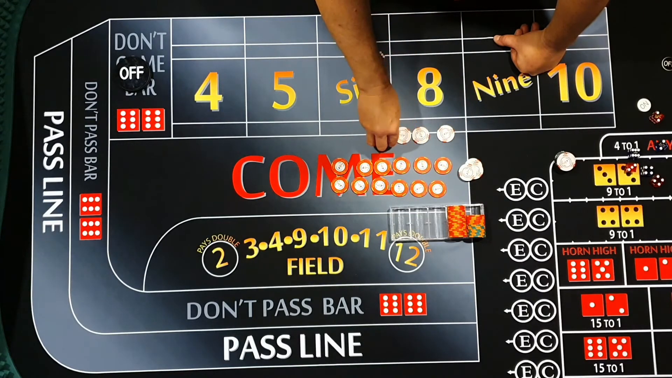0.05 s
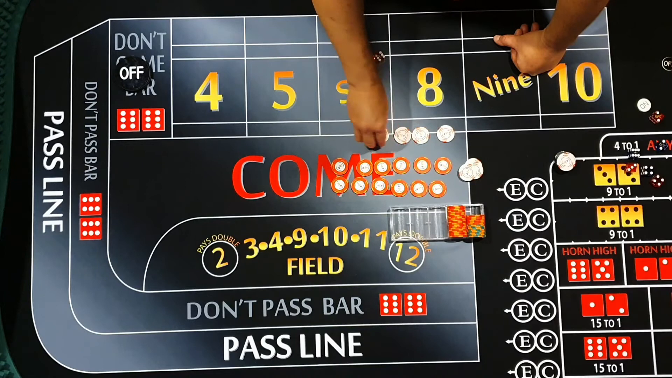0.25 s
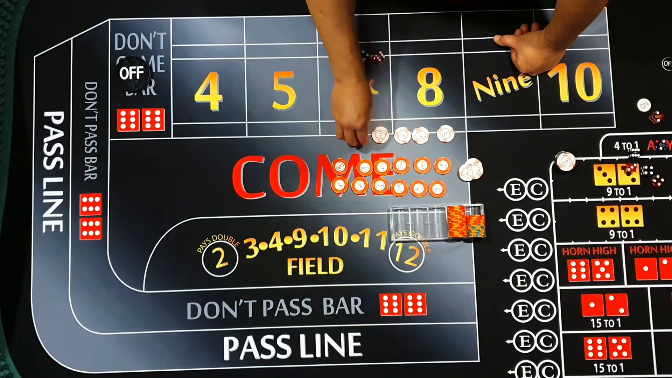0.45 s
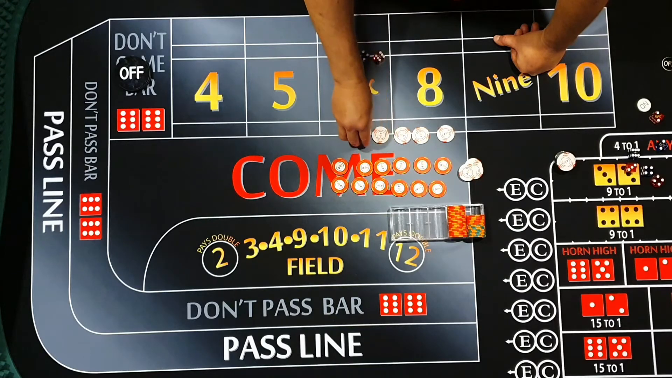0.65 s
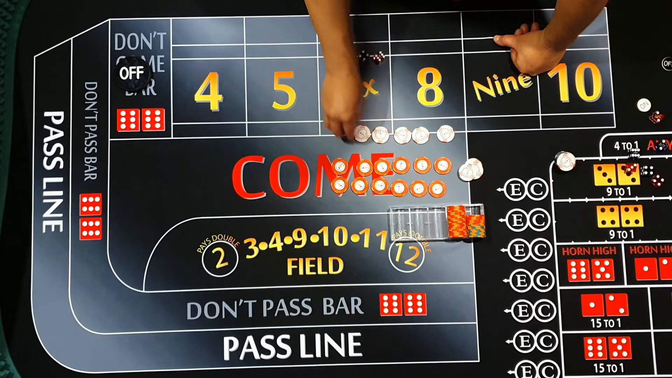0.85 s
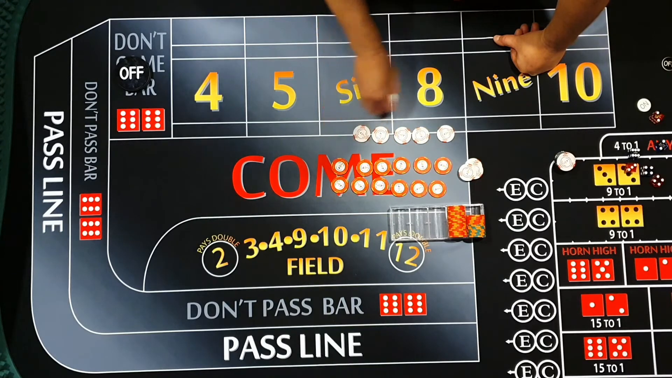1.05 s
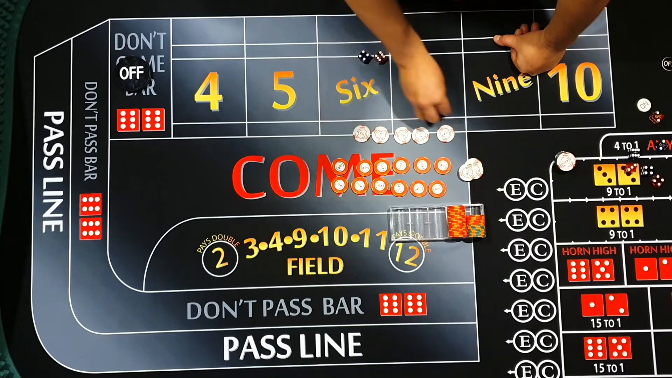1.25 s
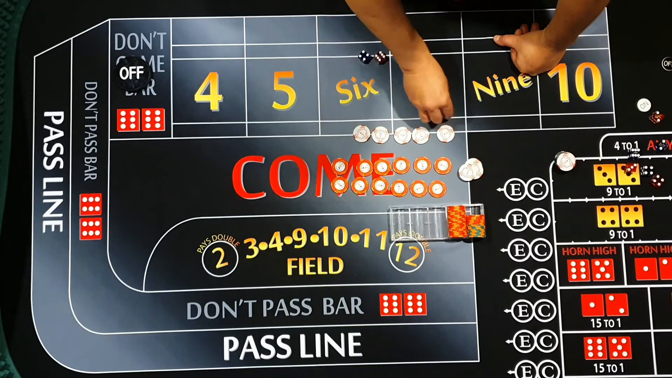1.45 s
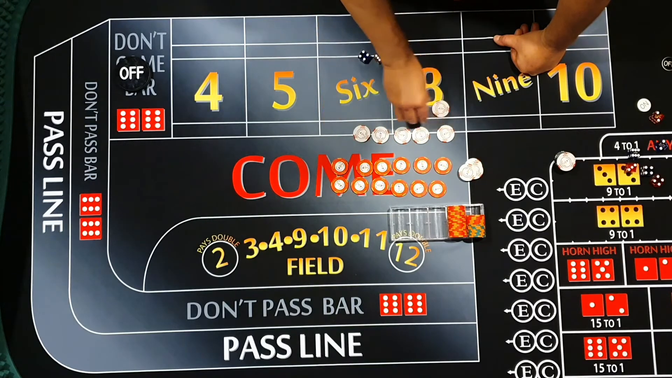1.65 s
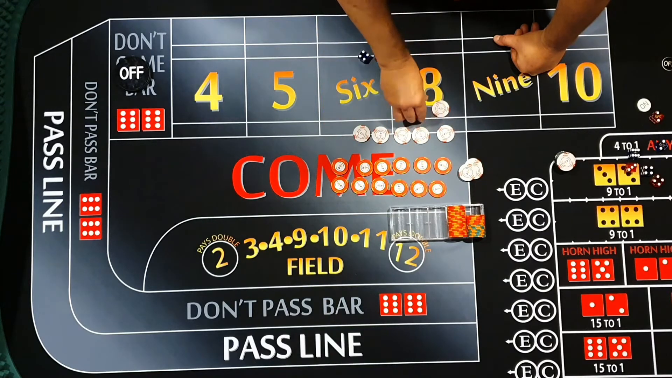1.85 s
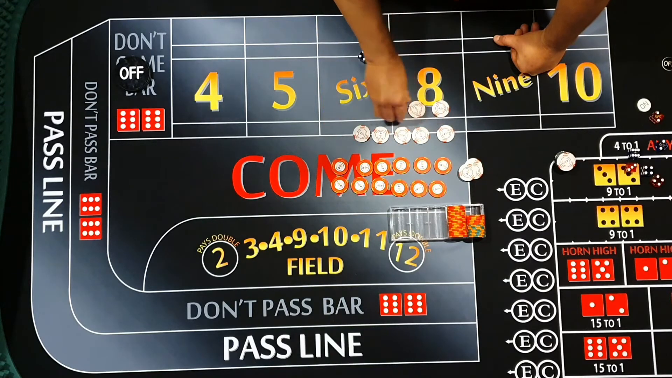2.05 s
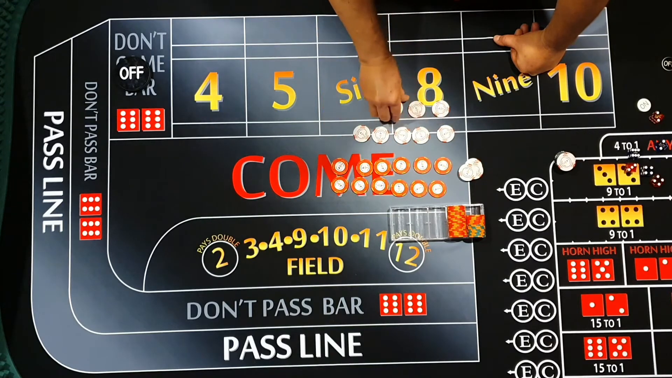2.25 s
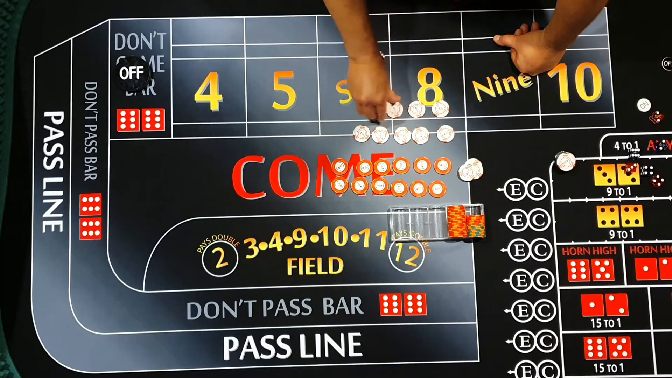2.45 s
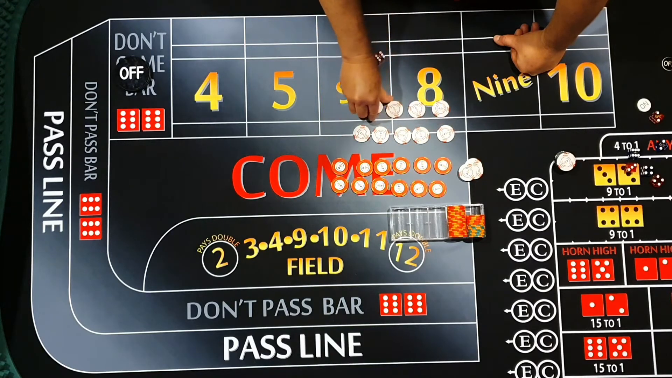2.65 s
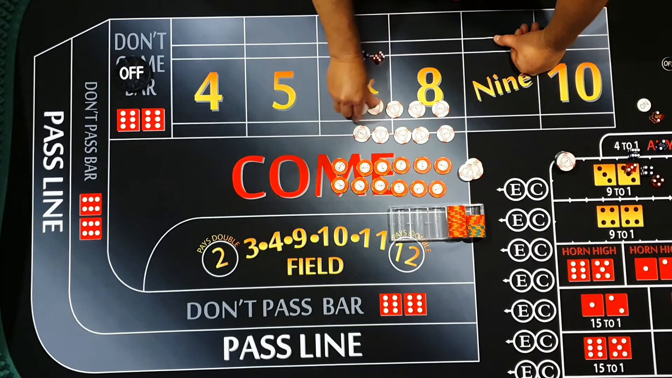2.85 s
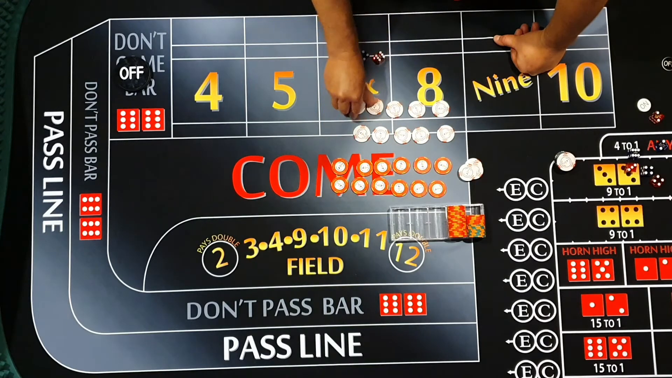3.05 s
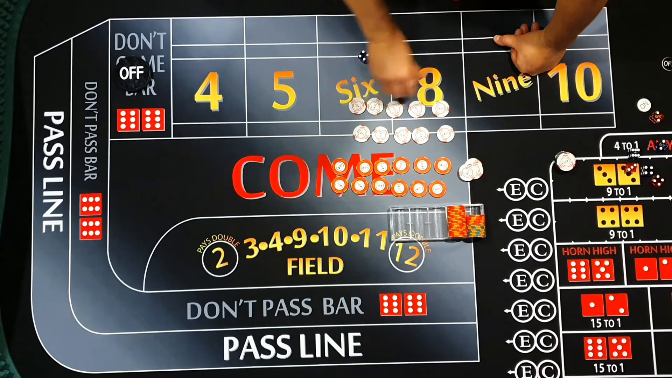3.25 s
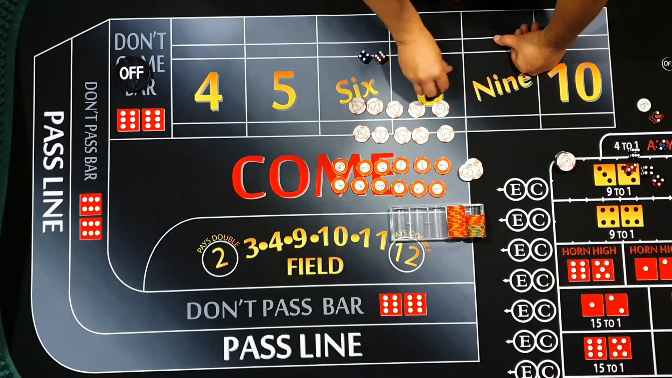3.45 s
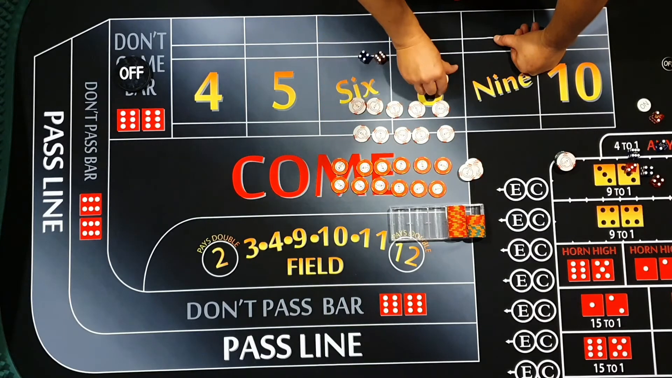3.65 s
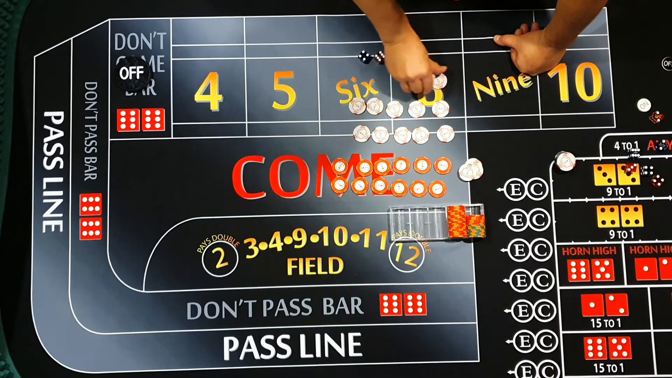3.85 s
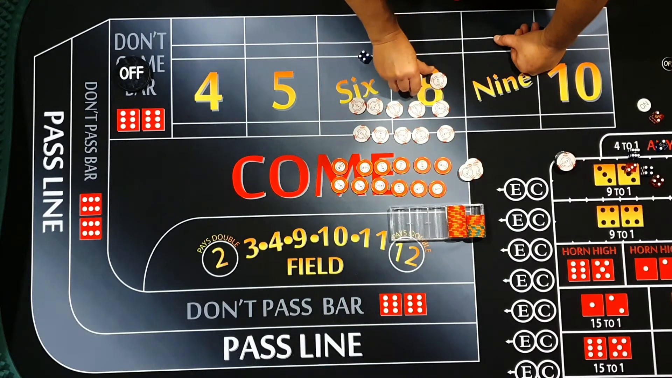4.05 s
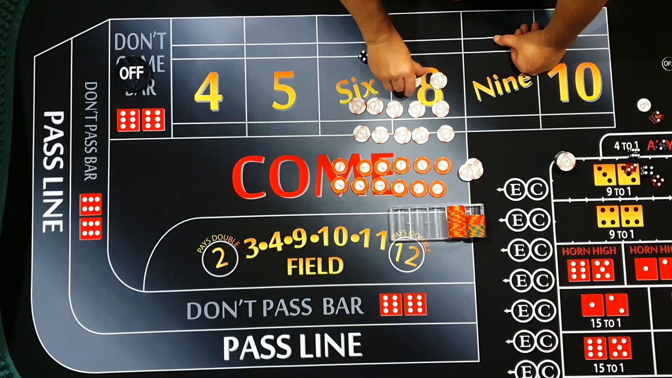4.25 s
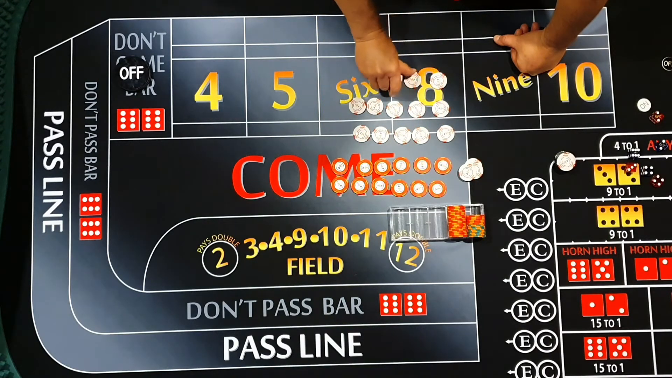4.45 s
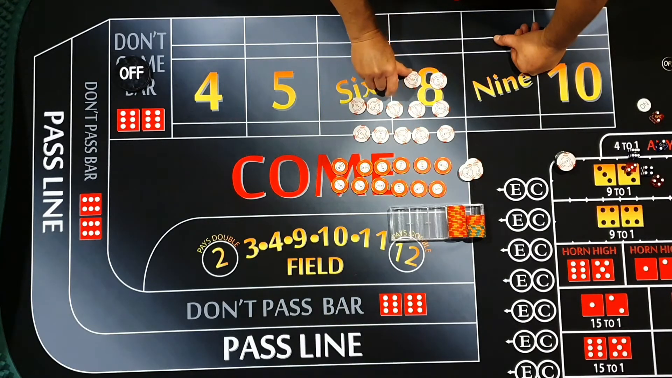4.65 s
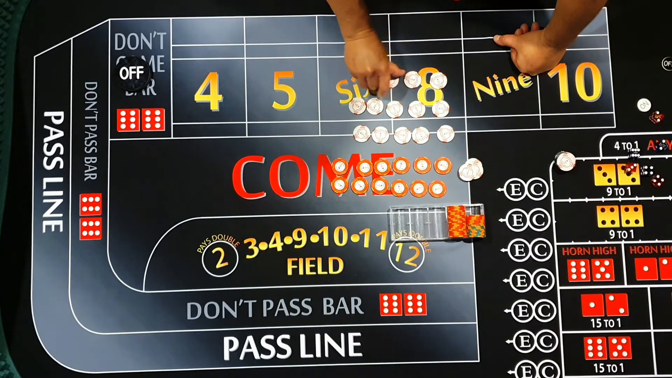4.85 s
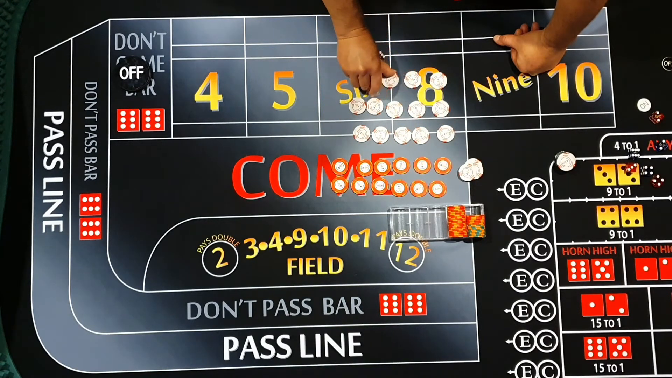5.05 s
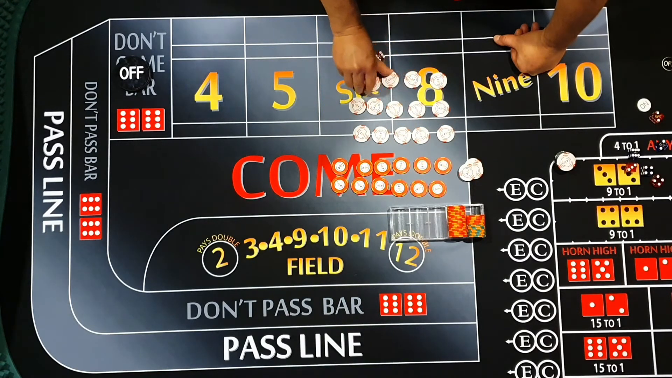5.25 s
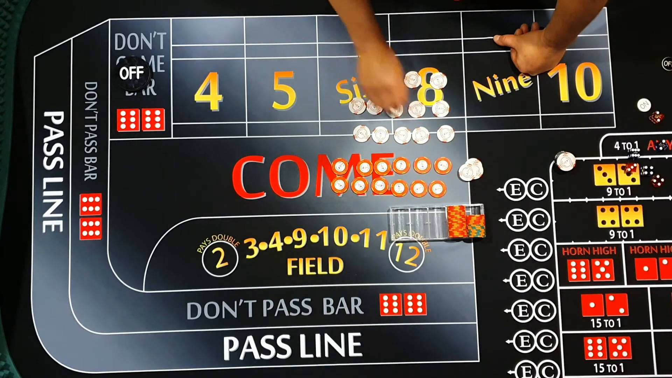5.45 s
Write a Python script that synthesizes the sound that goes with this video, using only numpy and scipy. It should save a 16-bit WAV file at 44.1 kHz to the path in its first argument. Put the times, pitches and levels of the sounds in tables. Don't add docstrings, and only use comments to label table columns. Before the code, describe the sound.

A hand slides faintly off felt for the first 0.3 seconds, while a clay chip lands at 0.2 with a sharp click and dull woody thump. More chips follow at 0.7, 1.47 (softer), 1.79, 2.31, 2.61, 2.96, 3.71, 4.14, 4.64 and 5.12. Most are tight double or triple contacts, edge then flat face, a few to some thirty milliseconds apart. The strongest come from about 3 seconds on, with an especially crisp clack at 4.65; the last is a looser, slightly brighter rattle. Clicks are dry and very short, with only a tiny high ring, over a padded tabletop knock and a short small-room reverberation. Between them are a very soft rub near 0.9, barely audible nail flicks around 1 to 1.5, a faint knuckle knock at 2.3, a bright chip tick at 3.3 and a rub near 4.87. Quiet room tone and microphone hiss, stronger left, run throughout.

```python
import sys
import numpy as np
from scipy import signal
from scipy.fft import rfft, irfft, next_fast_len
from scipy.io import wavfile
from scipy.ndimage import uniform_filter1d

SR = 44100
rng = np.random.default_rng(int(sys.argv[2]) if len(sys.argv) > 2 else 0)


def to_wav(s):
    ch = np.atleast_2d(s).T
    pcm = np.round(np.clip(ch, -1, 1) * 32767)
    wavfile.write(sys.argv[1], SR, pcm.astype(np.int16))


def boost_factor(decibels):
    exponent = np.asarray(decibels, float) / 20
    return 10 ** exponent


N = 242586

# (time [s], thump peak level [dB], click level [dB], ring level [dB])
LANDINGS = [(0.192, -24, -19, -50), (0.198, -19, -13.5, -37), (0.705, -20.5, -30, -48),
            (0.709, -20, -7.5, -35), (1.46, -31, -25, -47), (1.465, -20.5, -16, -36),
            (1.785, -19, -18, -44), (1.792, -15, -14, -39), (2.314, -16, -13.5, -39),
            (2.61, -19.5, -28, -39), (2.615, -17.5, -11.5, -62), (2.958, -17, -9.5, -36),
            (2.969, -11, -13, -29.5), (3.707, -18.5, -17.5, -32), (3.715, -10.5, -9, -24),
            (4.13, -15, -16.5, -39), (4.143, -11, -8.5, -29.5), (4.15, -20, -21, -39),
            (4.637, -15.5, -16, -42), (4.651, -12, -4.5, -31), (4.66, -19, -10, -37),
            (5.119, -17, -13.5, -25), (5.142, -18.5, -15.5, -25), (5.152, -20.5, -16.5, -26)]
# (frequency [Hz], level [dB], life [s])
CLAY_MODES = [(2790, -8, 0.00027), (3958, -3, 0.00039), (4863, -10, 0.00024), (9130, -39.5, 0.00026)]
# (frequency [Hz], width [Hz], level [dB])
TABLE_MODES = [(229.9, 18.2, 0), (310.1, 14.5, 3), (421.3, 43.4, -2.5), (570, 38, 0), (764, 12, -6),
               (943, 9.3, -2), (1042.4, 4.8, -3), (1354, 45, 1), (2274, 52, -2)]
# (delay [s], level [dB])
NEAR_ECHOES = [(.0016, -5), (.0026, -8), (.0036, -7), (.0052, -11), (.0070, -11), (.0085, -13),
               (.0115, -14)]
# (frequency [Hz], t60 [s])
ROOM_DECAY = [(80, 0.53), (250, 0.22), (700, 0.5), (1800, 0.57), (4800, 0.51), (10000, 0.39)]
# (frequency [Hz], level [dB])
WALL_COLOUR = [(60, -14), (150, 2.5), (300, 2), (1000, -6.5), (1800, 0), (2800, -7), (4300, -12),
               (6000, -5.5), (12000, -6.5)]
# (time [s], peak level [dB], pitch [Hz])
CHIP_TICKS = [
    (1.2965, -48, 1350),
    (3.2846, -56, 6300),
    (3.2894, -53, 4960),
    (3.3014, -34, 6060),
]
# (time [s], peak level [dB], pitch [Hz])
NAIL_FLICKS = [
    (0.9592, -56, 8800),
    (1.1064, -56, 7600),
    (1.2984, -60, 5800),
    (1.451, -57, 4000),
    (2.0847, -62, 9000),
]
# (time [s], peak level [dB], pitch [Hz])
KNUCKLE_KNOCKS = [
    (2.302, -40.5, 710),
    (3.544, -57.5, 254),
    (3.563, -62.5, 197),
]
# (frequency [Hz], width [Hz], level [dB]))
CHIP_RUBS = [
    ((.88, -65), [(4170, 60, 3), (5050, 40, -1), (5490, 60, 1.5)]),
    ((4.87, -60), [(4490, 40, 22), (6720, 90, 10), (9000, 100, 0)]),
]
# (frequency [Hz], width [Hz], level [dB])
SLIDE_MODES = [(326, 49, -11), (797, 100, -4), (1150, 160, -6.5)]
# (frequency [Hz], density [dB per Hz])
AIR_COLOUR = [(20, -30), (60, 3), (130, -2), (250, -3), (500, -5.5), (800, 0.5), (1500, -4.5), (3000, -5.5),
              (6300, -3.5), (7600, -11), (11500, -15.5), (14000, -19.5), (15800, -14), (16200, -53)]
# (frequency [Hz], density [dB per Hz])
HISS_COLOUR = [(20, 17), (80, 8.5), (250, -5), (800, 5.5), (2000, 0.5), (4500, -9.5), (7500, -4),
               (12000, -6), (15800, -5), (16200, -26)]

RING_HZ, RING_T60_S = 6780, 0.022
FIRM_DB = -19
DRUM_DB, DRUM_GAINS = 0.5, 0.85
EDGE_DB, EDGE_FADES = -3, 4.5
ECHO_CLAY_DB = -5
CLAY_SCATTER, CLAY_SCATTER_DB, TABLE_SCATTER_DB = 0.04, 2.5, 1.5
SETTLE_CYCLES = 3
RUB_RISE_S, RUB_FALL_S, RUB_SWELL_DB = 0.13, 0.22, 18
SLIDE_DB, SLIDE_EASE_S, SLIDE_EASE_DB = -60, 0.12, 2
SLIDE_LIFT_S, SLIDE_LIFT_DB = 0.17, 15


def chips():
    out = np.zeros((2, N))
    for s, db, click_db, ring_db in LANDINGS:
        soft_db = max(FIRM_DB - db, 0)
        drum_db = DRUM_DB + DRUM_GAINS * soft_db
        edge_db = EDGE_DB - EDGE_FADES * soft_db
        direct, blow = boost_factor(db - 2.5) * np.array(landing(click_db, ring_db, drum_db, edge_db))
        add(out, s, direct * boost_factor([[0.7], [-0.7]]))
        add(out, s, walls(blow, wet_db=-2))
    return out


def landing(click_db, ring_db, drum_db, edge_db):
    t = np.arange(SR // 6) / SR
    thump = burst(887, 0.00038, t - 0.0014)
    knock = thump + boost_factor(edge_db) * burst(2170, 0.00029, t - 0.0014)
    clay = boost_factor(click_db + 9) * clay_click(t)
    ring = boost_factor(ring_db + 8.5) * ringing(RING_HZ, RING_T60_S, np.clip(t - 0.0008, 0, None), 0.0012)
    drum = boost_factor(drum_db) * table_drum(thump)
    echoes = near_echoes(knock + boost_factor(ECHO_CLAY_DB) * clay)
    direct = knock + clay + echoes + boost_factor(12.5) * drum + ring
    blow = knock + boost_factor(ECHO_CLAY_DB / 2) * clay + boost_factor(7.5) * drum + boost_factor(-12) * ring
    return direct, blow


def clay_click(t):
    click = boost_factor(-24.5) * snap(np.clip(t - 0.001, 0, None), 0.0043)
    for hz, db, life in CLAY_MODES:
        level = boost_factor(db + rng.normal(0, CLAY_SCATTER_DB))
        peak_s = 0.001 + SETTLE_CYCLES / hz
        click = click + level * burst(hz * rng.normal(1, CLAY_SCATTER), life, t - peak_s)
    return click


def table_drum(thump):
    modes = [(hz * rng.normal(1, 0.0217), width, db + rng.normal(0, TABLE_SCATTER_DB))
             for hz, width, db in TABLE_MODES]
    return filtered(thump, resonant(modes))


def near_echoes(x):
    echoes = np.zeros(SR // 50)
    for s, db in NEAR_ECHOES:
        echoes[round(s * rng.normal(1, 0.05) * SR)] = boost_factor(db + rng.normal(0, 2))
    return np.convolve(x, echoes)[:len(x)]


def walls(x, wet_db):
    hz, t, z = signal.stft(rng.standard_normal(SR // 2), SR, nperseg=256)
    fade_db = along(WALL_COLOUR, hz)[:, None] - 60 * t / along(ROOM_DECAY, hz)[:, None]
    tail = signal.istft(z * boost_factor(fade_db), SR, nperseg=256)[1]
    tail = tail * (1 - np.exp(-np.arange(len(tail)) / SR / 0.004))
    return boost_factor(wet_db) * signal.fftconvolve(x, tail / np.linalg.norm(tail))


def fingers():
    out, t = np.zeros((2, N)), np.arange(SR // 20) / SR
    # (events, t60 [s], rise [s], snap level [dB], wall level [dB])
    kinds = ((CHIP_TICKS, 0.008, 0.0008, -30, -14),
             (NAIL_FLICKS, 0.003, 0.0002, 3, -16),
             (KNUCKLE_KNOCKS, 0.025, 0.0004, -50, -1))
    for events, t60, rise_s, snap_db, wet_db in kinds:
        for s, db, hz in events:
            modes = ringing(hz, t60, t, rise_s)
            modes = modes + 0.18 * ringing(1.81 * hz, t60 * 0.5, t, rise_s)
            modes = modes + 0.77 * ringing(0.87 * hz, t60 * 0.5, t, rise_s)
            close = boost_factor(db + 6.5) * (modes + boost_factor(snap_db) * snap(t, 0.0014))
            add(out, s, close)
            add(out, s, walls(close, wet_db))
    return out


def strokes():
    eased_db = SLIDE_DB - SLIDE_EASE_DB
    slide = [(0, SLIDE_DB), (SLIDE_EASE_S, eased_db),
             (SLIDE_EASE_S + SLIDE_LIFT_S, eased_db - SLIDE_LIFT_DB)]
    out = friction(slide, SLIDE_MODES, grain_db=0)
    for (s, db), modes in CHIP_RUBS:
        faint_db = db - RUB_SWELL_DB
        swell = [(s - RUB_RISE_S, faint_db), (s, db), (s + RUB_FALL_S, faint_db)]
        out = out + friction(swell, modes, grain_db=2.5)
    return out


def friction(curve, modes, grain_db):
    s, db = np.transpose(curve)
    level = boost_factor(np.interp(np.arange(N) / SR, s, db, left=-120, right=-120))
    grip = boost_factor(grain_db * unit(uniform_filter1d(rng.standard_normal(N), size=400)))
    return level * unit(filtered(grip * rng.standard_normal(N), resonant(modes)))


def room_tone():
    air = coloured_noise(AIR_COLOUR)
    hiss = coloured_noise(HISS_COLOUR)
    return boost_factor(-67) * air + boost_factor(-67) * hiss * np.array([[1], [0]])


def coloured_noise(colour):
    return unit(filtered(rng.standard_normal(N), lambda hz: boost_factor(along(colour, hz))))


def burst(hz, life, t):
    return -np.cos(2 * np.pi * hz * t) * np.exp(-(t / life) ** 2 / 2)


def ringing(hz, t60, t, attack=0.0001):
    return np.sin(2 * np.pi * hz * t) * boost_factor(-60 * t / t60) * (1 - np.exp(-t / attack))


def snap(t, t60):
    edge = resonant([(6500, 4500, 4)])
    spit = rng.standard_normal(len(t)) * boost_factor(-60 * t / t60) * (t > 0)
    return filtered(spit, lambda f: edge(f) ** 2)


def resonant(modes):
    def response(f):
        total = 0
        for k, (hz, width, db) in enumerate(modes):
            damping = 1j * f * width
            total = total + (-1) ** k * boost_factor(db) * damping / (hz * hz - f * f + damping)
        return total
    return response


def filtered(x, response):
    m = next_fast_len(x.shape[-1] + SR // 4)
    return irfft(rfft(x, m) * response(np.fft.rfftfreq(m, 1 / SR)), m)[..., :x.shape[-1]]


def along(points, hz):
    f, v = np.transpose(points)
    return np.interp(np.log(hz + 1), np.log(f + 1), v)


def unit(x):
    return x / np.sqrt(np.mean(x ** 2) + 1e-20)


def add(track, s, sound):
    at = track[..., round(s * SR):]
    at[..., :sound.shape[-1]] += sound[..., :at.shape[-1]]


def scene():
    return chips() + fingers() + strokes() + room_tone()


def band_level(z):
    bands = np.abs(z[:1024]).reshape(64, 16, -1).mean(axis=1)
    return np.repeat(bands, 16, axis=0)


def narrowed(x, keep_db, jump_db):
    mid_side = np.array([x[0] + x[1], x[0] - x[1]]) / 2
    mid, side = signal.stft(mid_side, nperseg=2048)[2]
    total = np.abs(mid).sum(axis=0)
    attack = total > boost_factor(jump_db) * np.roll(total, 2)
    keep = (band_level(side) > boost_factor(keep_db) * band_level(mid)) | attack
    kept = signal.istft(side * np.vstack([keep, keep[-1:]]), nperseg=2048)[1][:N]
    return mid_side[0] + np.array([kept, -kept])


def roll_off(x):
    return signal.sosfilt(signal.butter(12, 16090, fs=SR, output="sos"), x)


def record(dry):
    heard = filtered(dry, lambda f: (1j * f / (120 + 1j * f)) ** 2 * (f < 15790))
    mix = narrowed(heard, keep_db=-10.5, jump_db=9)
    return roll_off(mix)


dry = scene()
out = record(dry)
to_wav(out)
```